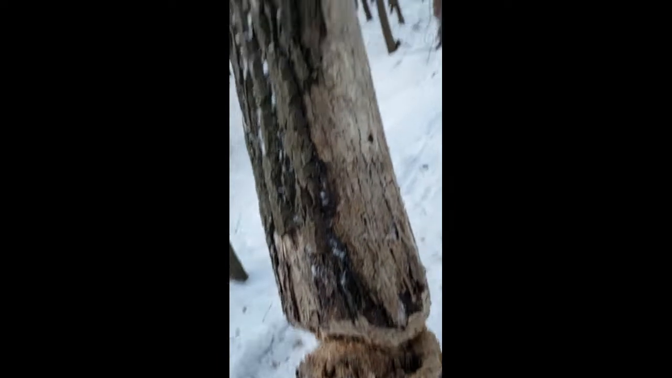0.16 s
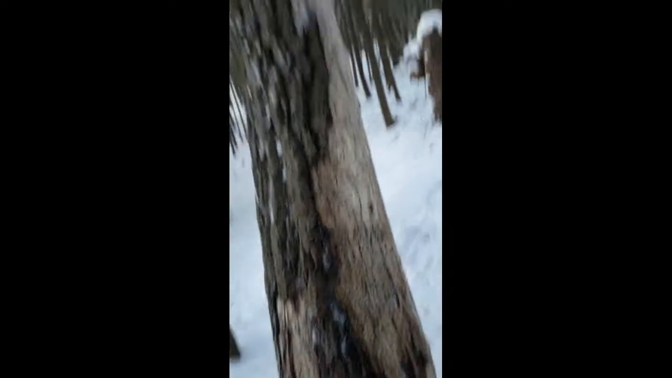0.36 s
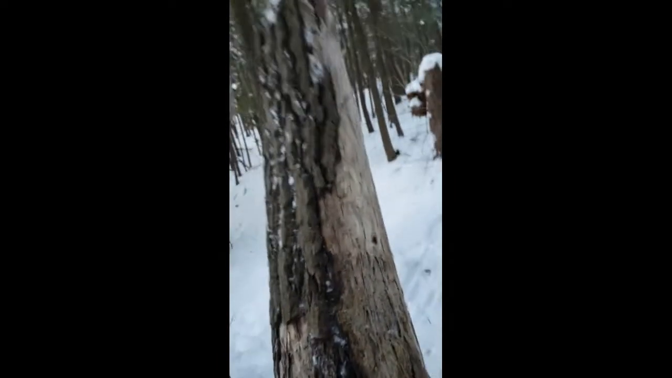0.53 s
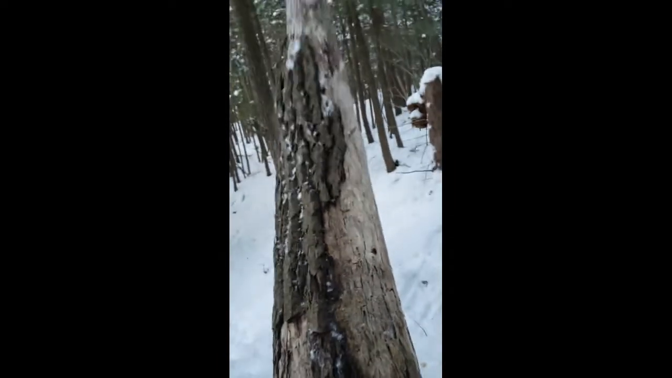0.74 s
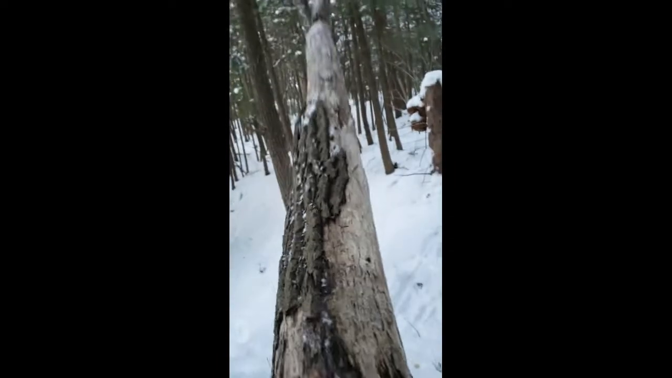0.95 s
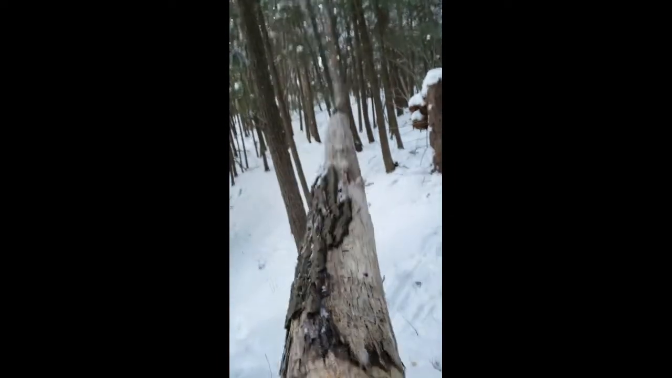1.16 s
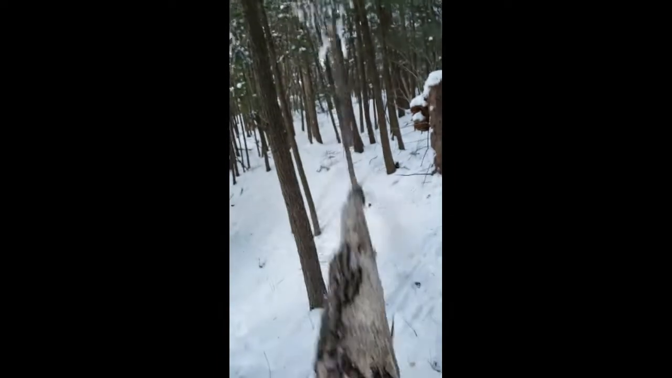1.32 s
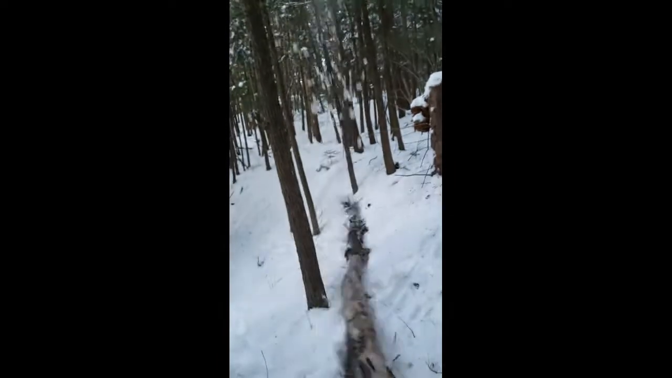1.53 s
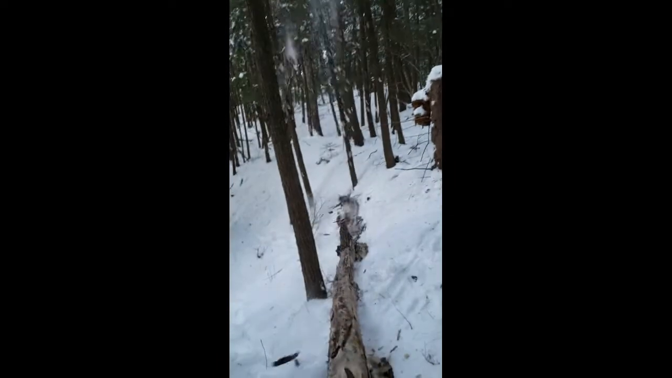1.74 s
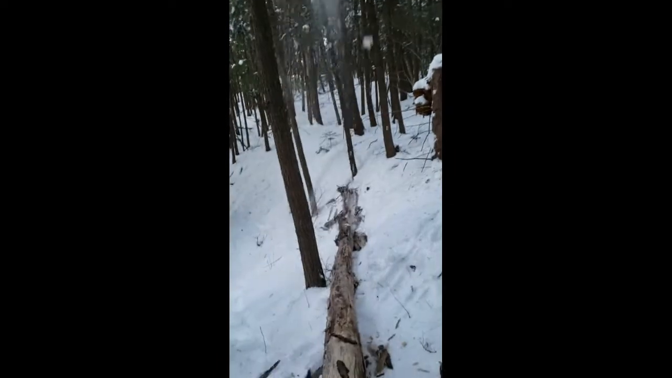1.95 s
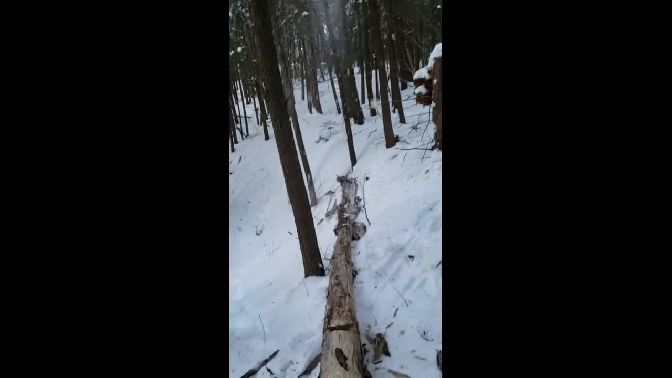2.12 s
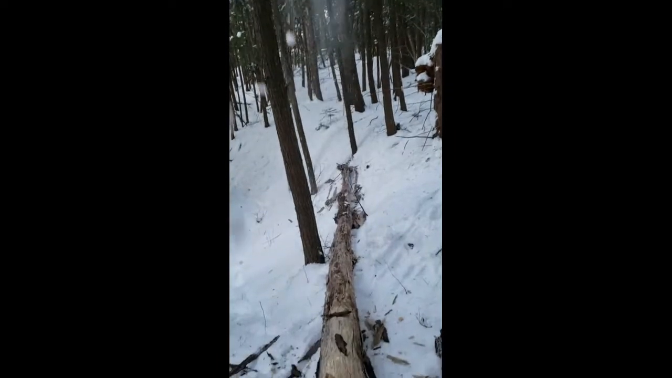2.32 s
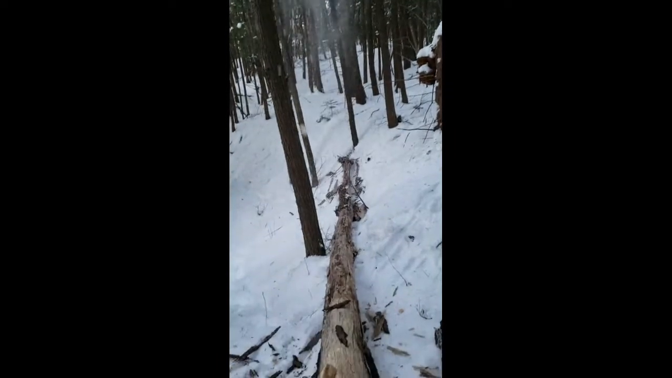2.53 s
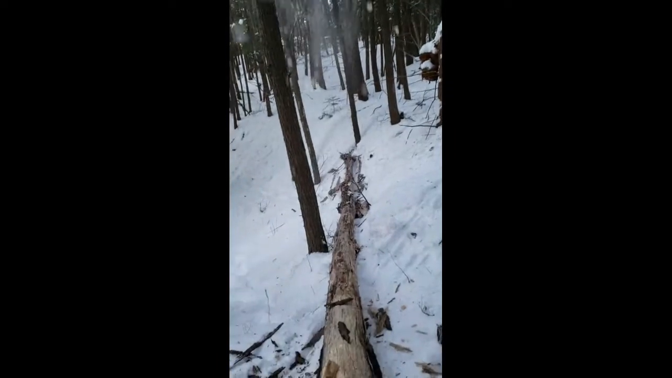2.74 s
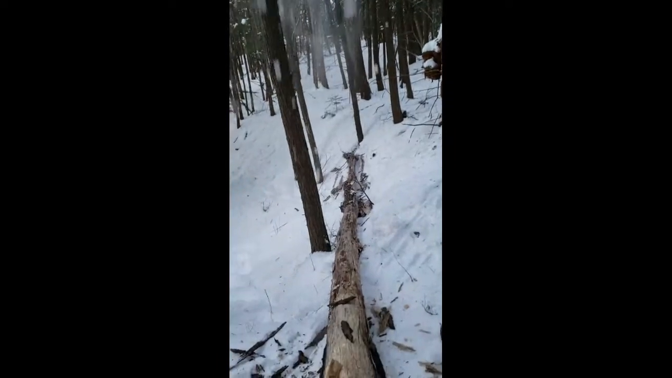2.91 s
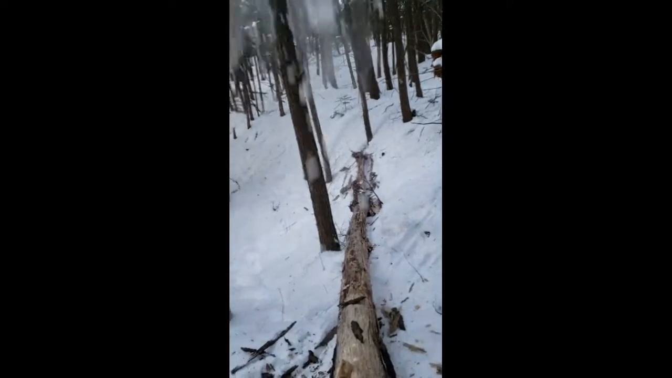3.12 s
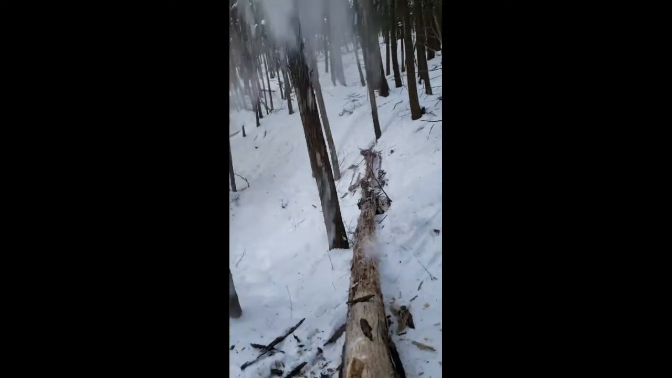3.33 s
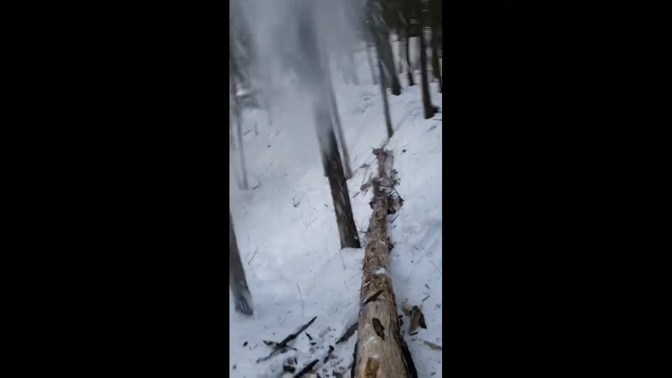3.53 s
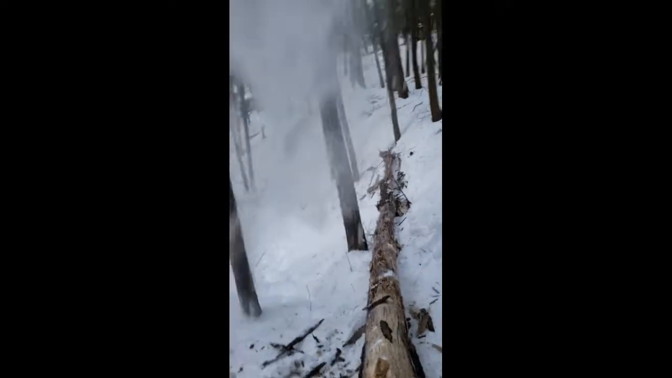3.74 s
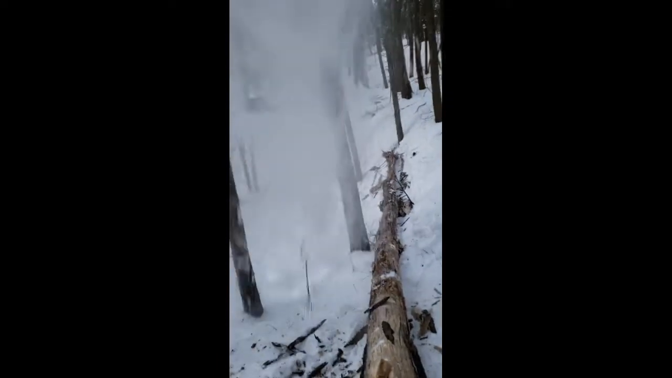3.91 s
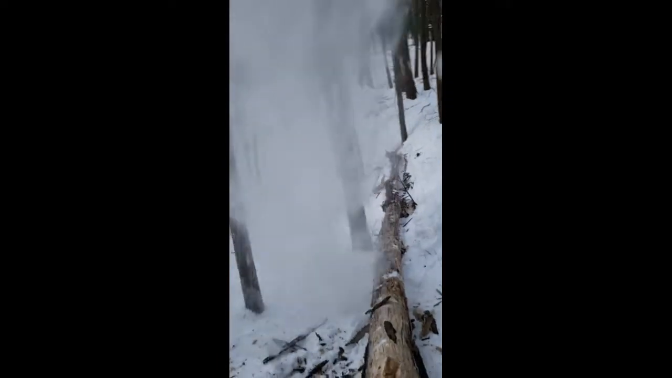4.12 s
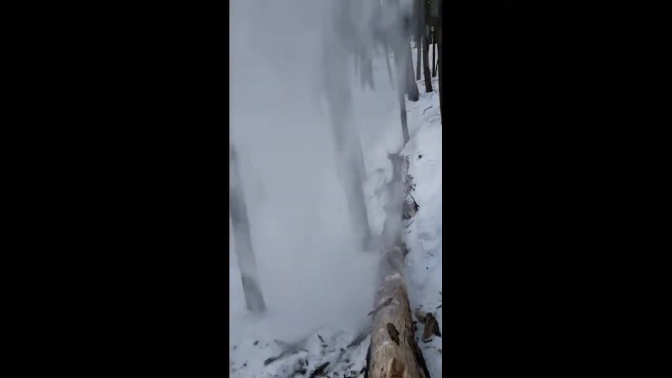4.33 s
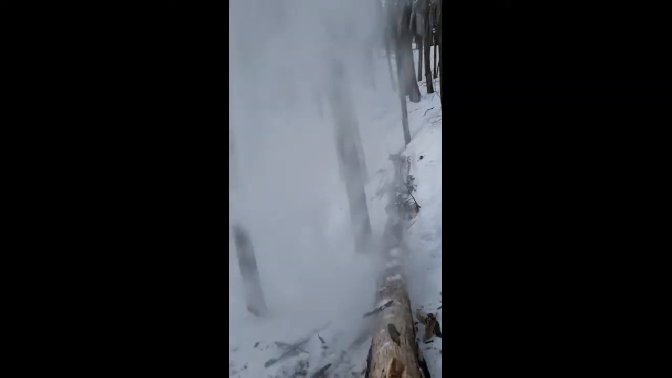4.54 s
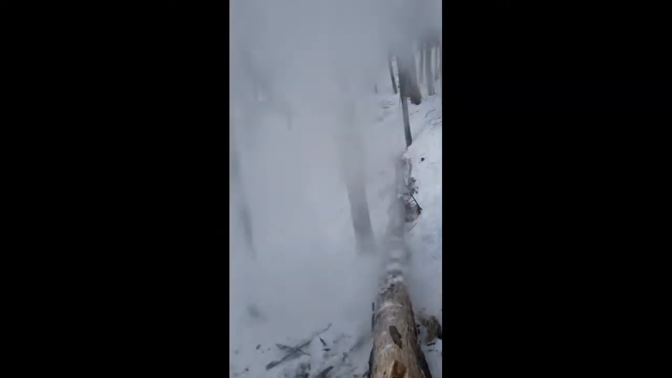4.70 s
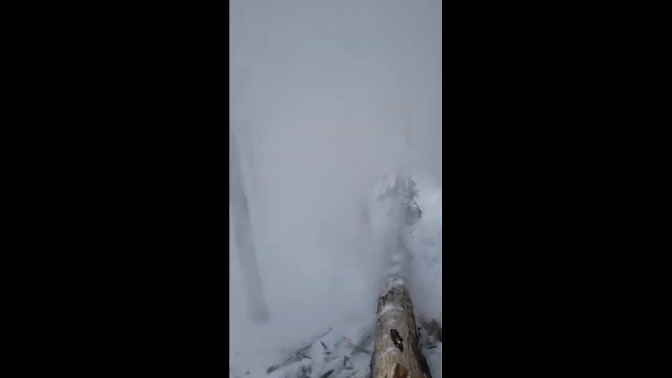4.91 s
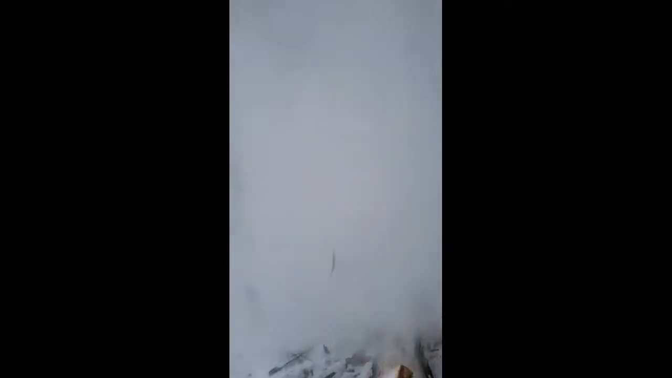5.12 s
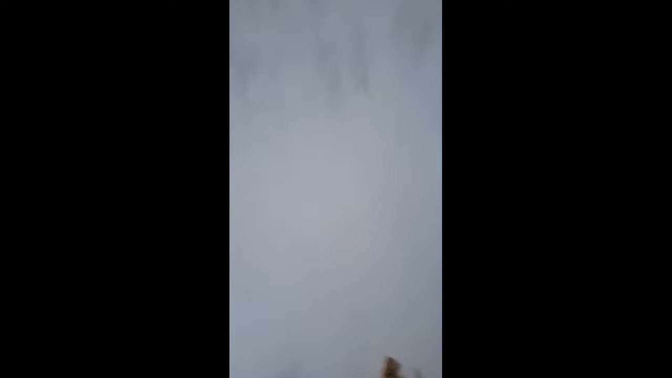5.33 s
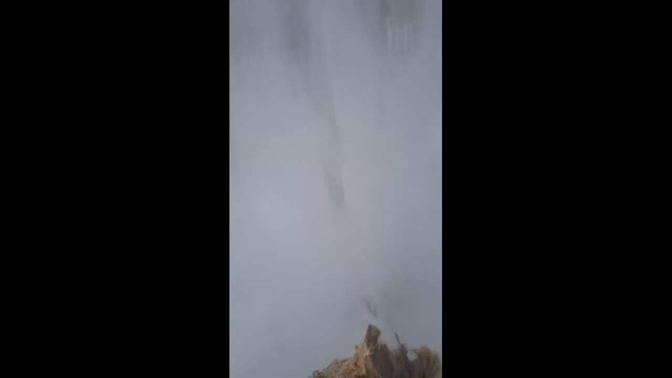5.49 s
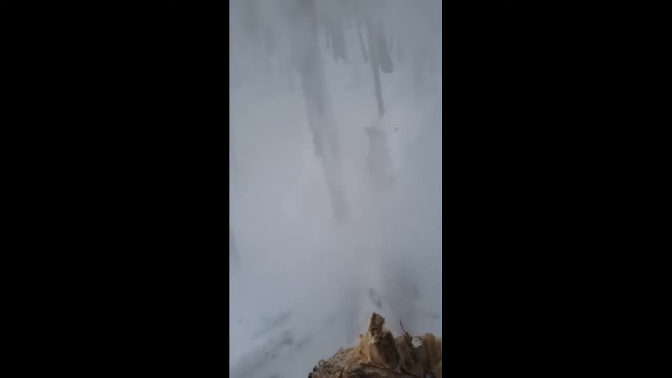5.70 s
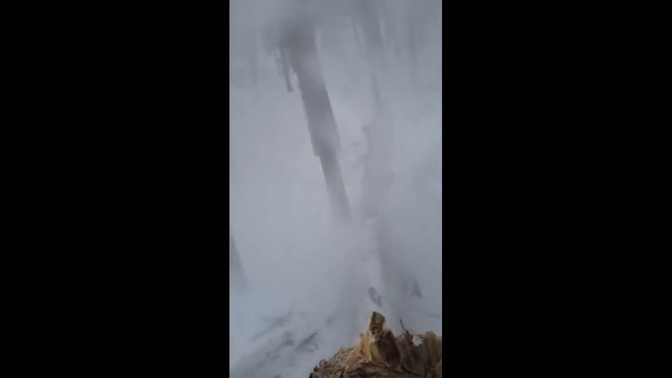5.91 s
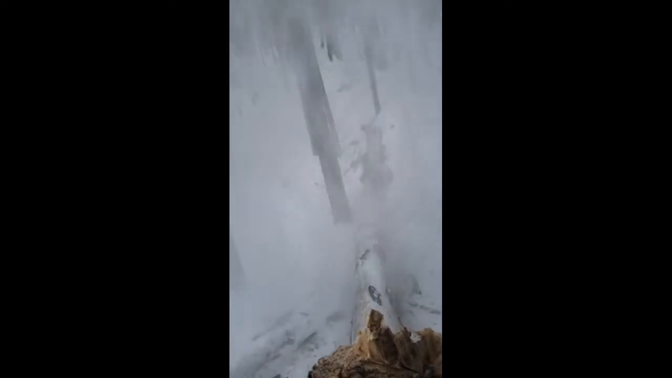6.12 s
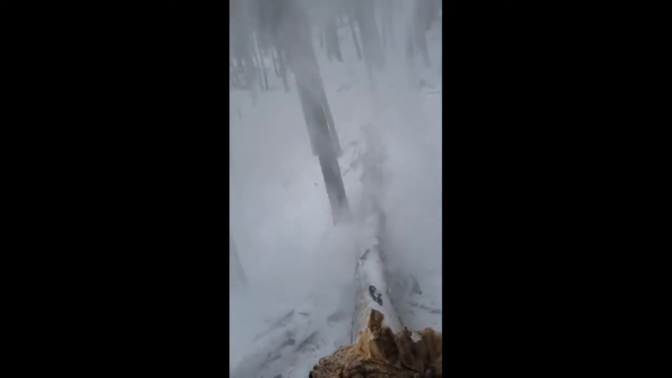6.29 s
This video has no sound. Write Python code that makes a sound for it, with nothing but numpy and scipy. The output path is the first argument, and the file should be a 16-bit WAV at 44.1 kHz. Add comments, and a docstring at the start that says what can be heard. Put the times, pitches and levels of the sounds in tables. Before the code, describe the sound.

In a quiet snowy forest, close to a handheld stereo microphone, a dead tree begins to fall. A faint high squeak of wood lasts a tenth of a second, then dry snaps multiply, strongest around 0.3-0.5 s, as the butt grinds in a low judder over its stump until about 0.65 s. More cracks and a short scrape follow; at 1.25 s splinters rasp shrilly. From 1.48 to 1.63 s the trunk lands in rapid heavy thuds, the loudest crunching at 1.55 s, with brittle crackle and faint echo. Debris patters away by 2.5 s, with soft thumps near 2.55 s. Powder hiss grows from about 3 s, joined by dense patter from 3.7 s. Soft snow lumps thump at 4.0-5.4 s, thickest around 4.3-4.6 and 5.2 s, among twig snaps and dull bark knocks. After 5.5 s it thins to scattered soft plops and fading hiss until 6.4 s.

```python
"""A dead tree is pushed over in a snowy forest, close by: stick-slip squeaks, sharp snaps and shrill rasps,
a grind of random collisions as the butt moves over its stump, then decaying thuds as the trunk lands.
The shaken trees around it shed their snow: filtered grains hiss and patter, soft lumps thump with a falling
pitch, twigs tick and falling bark knocks in damped modes. A faint echo follows the tree; the air stirs softly."""
import sys
import numpy as np
from scipy import signal
from scipy.fft import rfft, irfft
from scipy.io import wavfile

SR = 44100
rng = np.random.default_rng(int(sys.argv[2]) if len(sys.argv) > 2 else 0)


def put_to_file(sound):
    """Save the sound as 16-bit audio at rate SR, in the file named by the first command-line argument."""
    columns = np.atleast_2d(sound).T  # one column per channel
    safe = np.clip(columns, -1, 1)
    whole_steps = np.round(safe * 32767)
    wavfile.write(sys.argv[1], SR, whole_steps.astype(np.int16))


N = 284533
TIME = np.arange(N) / SR
LANDED_S = 1.68   # the grinding ends and the snowfall starts

# Spectrum of splintering wood. Each row: frequency in Hz, relative density in dB per Hz.
SPLINTER_SPECTRUM = [(500, 0.5), (1000, 3.5), (1800, -3), (3500, 2), (6000, -1), (9000, -3.5),
                     (16000, -9.5)]
# Spectrum of soft snow clumps. Each row: frequency in Hz, relative density in dB per Hz.
CLUMP_SPECTRUM = [(15, -40.5), (25, -19), (75, -1), (128, 0), (219, -4.5), (345, -9), (560, -19.5),
                  (800, -17.5), (1200, -22.5), (1560, -40.5), (2640, -120)]


def squeak(jitter=0.021, waver_hz=350, flutter=0.4):
    """Stick-slip friction: three contact spots at close pitches beat; two weaken as the slip gets smoother."""
    # Wood rubbing on wood. Each row: time in seconds, mean pitch in Hz, relative level in dB, roughness 0-1.
    friction = [(0, 3206, -41.5, 0.68), (.012, 3064, -45, 0.82), (.025, 3074, -46, 0.85),
                (.04, 3040, -46, 0.77), (.05, 2960, -40, 0.1), (.06, 2916, -38, 0.12),
                (.075, 2770, -37, 0.25), (.082, 2840, -35, 0.2), (.092, 3080, -46, 0.4),
                (.104, 3130, -46, 0.9), (.11, 3110, -75, 1)]
    # Harmonics. Each row: multiple of the pitch, level in dB when slipping smoothly, level in dB when rough.
    partials = [(1, 1, 0.5), (2, -11, -10.5), (3, -21, -9), (4, -21, -12)]
    hz, level_db, rough = in_time(friction)
    # pitch ratio and share of each contact spot
    spots = [(1, 1), (.93, from_db(-2) * rough), (1.1, from_db(-1) * rough ** 2)]
    tone = 0
    for ratio, share in spots:
        wobble, grip = (rms_one(butter(n, waver_hz, "low")) for n in rng.standard_normal((2, N)))
        phase = 2 * np.pi * np.cumsum(ratio * hz * (1 + jitter * rough * wobble)) / SR
        harmonics = 0
        for multiple, smooth_db, rough_db in partials:
            partial_db = smooth_db + rough * (rough_db - smooth_db)
            harmonics = harmonics + from_db(partial_db) * np.sin(round(multiple) * phase)
        tone = tone + share * (1 + flutter * grip) * rms_one(harmonics)
    return tone * from_db(level_db) * (TIME < friction[-1][0]) * from_db([[-2], [1]])


def cracks(rise_s=0.0002, break_after_s=0.0012, tearing=0.78, width_share=0.51, bright=.15,
           tail_db=-30, tail_s=0.048, left_lag_s=0.00025, shadow_hz=7000):
    """Impulsive fracture: a sharp release amid brief tearing rings the splinter and knocks the wood behind."""
    # Fibres, bark and twigs snapping. Each row: start in seconds, relative level in dB, pitch in Hz,
    # woody knock in dB re the snap, tearing time in ms, left-right pan in dB.
    snaps = [(0.0257, -53, 5200, 0, 2, -2), (0.0458, -45, 5200, -3.5, 1.6, -4),
             (0.073, -53, 5000, -17, 1.5, 0), (0.094, -43.5, 5000, -8, 2.6, 0),
             (0.1461, -43.5, 3640, -2, 2.1, -5), (.221, -45.5, 2250, -1.5, 5.6, 1),
             (0.23, -53.5, 12100, 1, 5.3, 2), (.2602, -59, 12200, 6, 3.1, -7),
             (.274, -53.5, 4770, -6, 1, 1), (.316, -38, 12800, -5, 1.2, 1),
             (0.3319, -32, 13600, -7, 1.4, -1), (.381, -56, 12500, -7, 1.6, 1),
             (.416, -28.5, 7840, -7.5, 1.4, 4), (.429, -44, 6300, -16, 0.88, 1),
             (0.4478, -44, 4400, -11, 2.2, -3), (0.4521, -34.5, 8600, -9, 1.7, -1),
             (.49, -43, 5230, 0, 2.8, 5), (0.514, -50, 5900, -11, 1.5, 0), (0.5243, -50, 5050, 1.5, 2, 5),
             (0.541, -44.5, 5370, 0, 3, 3), (.569, -45, 6240, -7, 1.3, 0), (0.6139, -49.5, 7000, -7, 2, 1),
             (0.6933, -53.5, 6370, -12, 3.4, 0), (0.6977, -59, 6300, -10, 1.5, -2),
             (0.709, -50, 12500, -8, 1.3, 3), (0.714, -49.5, 3180, -4, 4, -8),
             (0.74, -41, 9500, -20, 2.1, 6), (.744, -42.5, 5550, -5, 2.9, -1),
             (0.7523, -38.5, 7160, -7, 1.7, -4), (.814, -34.5, 3100, 0, 1.7, -3),
             (.8304, -62, 9000, -6, 1.5, 0), (0.939, -59, 9800, -8, 1.2, -7),
             (.9524, -63, 5720, -19, 2, -4), (0.9772, -48.5, 6440, -4, 2, -4),
             (1.049, -60, 5560, -5, 3.3, 1), (1.086, -59, 4500, -20, 3.2, -3),
             (1.249, -35.5, 11300, -5.5, 4.5, -1), (1.4851, -43, 2600, 7, 1.4, 1),
             (1.4935, -37.5, 2800, -2, 3, 0), (1.537, -36.5, 5000, -8, 3, -1),
             (1.5497, -32, 2500, -6, 4, -1), (1.577, -38.5, 3800, 0, 2.3, -2),
             (1.606, -27.5, 4000, -19, 5.4, -2.5), (1.9849, -65, 4900, -12, 2, -3),
             (2, -56, 14300, -20, 1.5, 2), (2.076, -61, 11100, -22.5, 2.5, -4),
             (2.331, -55, 11400, -19.5, 3.3, 5), (2.3512, -61.5, 5050, -16, 3.8, -6),
             (2.377, -50.5, 13860, -22, 4, 11), (3.1088, -57, 4760, 2.5, 4.6, -9.5),
             (3.582, -44, 7850, -6.5, 13, -0.5), (3.6394, -48, 3800, -0.5, 6.1, -3.5),
             (3.717, -38, 5050, -5, 2.5, 0.5), (3.9271, -41, 7600, -8, 2.2, 6),
             (4.1675, -45.5, 5400, -3, 2.1, -4), (4.4666, -48, 3500, -18, 5.1, -4),
             (4.5389, -39, 2580, -33, 1.8, 0.5), (4.713, -45, 5060, -10, 4, 2),
             (4.805, -47, 4250, -6.5, 9.6, -1), (4.9203, -32.5, 4000, -4.5, 2.3, -6),
             (4.9744, -47, 4060, -31, 1.8, -2), (5.154, -50.5, 14100, -16, 1, -5),
             (5.3632, -53, 4000, 3.5, 1, -11.5), (5.744, -57.5, 3500, 1, 1.1, -15),
             (5.9755, -46, 4170, -7.5, 5.6, 1)]
    out, t = np.zeros((2, N)), TIME[:SR // 20]
    age = t - break_after_s
    release = rms_one(1. * (np.arange(len(t)) == round(break_after_s * SR)))
    tail = from_db(tail_db) * np.exp(-np.abs(age) / tail_s) * (age > 0)
    for s, level_db, hz, knock_db, tear_ms, pan_db in snaps:
        tear_s = tear_ms / 1000
        tear_envelope = np.exp(np.minimum(age / rise_s, -age / tear_s)) + tail
        fibres, scatter = rng.laplace(size=(2, len(t))) * tear_envelope
        force = release + tearing * rms_one(fibres)
        # the left side hears mostly scattered sound
        force = np.array([0.26 * force + 1.5 * rms_one(scatter), force])
        snap = rms_one(resonate(force, hz, width_share * hz) + bright * butter(force, 1500, "high"))
        knock_hz = rng.uniform(432, 801)
        knock = rms_one(resonate(force, knock_hz, 480) - resonate(force, 2100, 1100))
        hit = (snap + from_db(knock_db) * knock) * from_db([[pan_db / 2], [-pan_db / 2]])
        i = round(s * SR)
        out[:, i:i + len(t)] += from_db(level_db) * hit[:, :N - i]
    # the left port is shadowed and a little farther away
    late_left = np.interp(TIME - left_lag_s, TIME, out[0])
    return np.array([from_db(-3.5) * butter(late_left, shadow_hz, "low"), out[1]])


def rasps(wander=0.13, waver_hz=900, octave_db=-5, flutter=0.93):
    """Irregular stick-slip: very fast, uneven slipping frequency-modulates a tone and its octave."""
    # Splinters dragged over each other. Each row: peak in seconds, rise in seconds, fall in seconds,
    # mean pitch in Hz, relative level in dB.
    drags = [(1.008, .003, 0.014, 2200, -55), (1.217, .004, 0.0034, 5770, -38),
             (1.2499, .0012, 0.002, 5774, -19), (1.264, .0008, 0.0026, 5670, -26.5),
             (1.268, .001, 0.0018, 5800, -25.5), (1.291, .002, .006, 3280, -35.5),
             (1.308, .003, .003, 5900, -43.5), (1.344, 0.0026, 0.0034, 6900, -33.5)]
    wobble, grip = (rms_one(butter(n, waver_hz, "low")) for n in rng.standard_normal((2, N)))
    warped_s, out = np.cumsum(1 + wander * wobble) / SR, 0
    for s, rise, fall, hz, db in drags:
        phase = 2 * np.pi * hz * warped_s
        tone = np.sin(phase) + from_db(octave_db) * np.sin(2 * phase)
        out = out + from_db(db) * swell(s, rise, fall) * tone
    return out * (1 + flutter * grip) * from_db([[-5], [0]])


def tipping():
    """Friction as random collisions: the butt judders over the stump in dull knocks while fibres tear."""
    # Stages of rubbing, then of tearing fibres. Each row: relative level in dB, full at seconds,
    # ends at seconds, rise in dB/s, sag in dB/s, fade in dB/s.
    leaning, sliding = (-54.5, .16, .37, 12, 3, 200), (-30, .422, .625, 2000, 34, 130)
    scraping, toppling = (-35.5, .71, .755, 300, 5, 350), (-50.5, 1.22, 1.29, 85, 3, 200)
    straining, ripping = (-56.5, .05, .41, 20, 8, 100), (-48, .45, .55, 240, 10, 70)
    parting, brushing = (-51, .74, .8, 120, 20, 55), (-51.5, 1.22, 1.3, 85, 3, 110)
    # The butt catches on the stump. Each row: peak in seconds, rise in seconds, fall in seconds, level in dB.
    jolts = [(.203, 0.0045, 0.0033, -41.5), (.275, 0.0097, 0.0038, -40.5), (.338, 0.0069, 0.0038, -42),
             (.818, .002, 0.0098, -43), (1.01, 0.0054, 0.025, -51)]
    # Spectrum of the grinding butt. Each row: frequency in Hz, relative density in dB per Hz.
    grind_spectrum = [(18, -32), (30, -6.5), (91, 0.5), (142, -3), (230, -2.5), (303, -11), (456, -17),
                      (560, -12.5), (800, -20.5), (1360, -31.5), (2500, -32), (3250, -59.5), (5500, -120)]
    rubbing = stage(leaning) + stage(sliding) + stage(scraping) + stage(toppling) + bursts(jolts)
    tearing = waves([straining, ripping, parting, brushing])
    judder = ticks(per_s=700, spread_db=1.7, low_hz=95, high_hz=300, cycles=3.5)
    catching = surge(depth_db=1.3, rate_hz=29)
    grit = grains(grind_spectrum, per_s=1100, spread_db=2.5, smooth=0.7)
    grind = rubbing * catching * (grit + 0.5 * judder)
    fibres = ticks(per_s=550, spread_db=3.5, low_hz=1000, high_hz=7000, cycles=3)
    crackle = grains(SPLINTER_SPECTRUM, per_s=2400, spread_db=8.0, smooth=0.94)
    splinter = tearing * (crackle + 0.4 * fibres)
    return (grind + splinter * from_db([[-.5], [.5]])) * (TIME < LANDED_S)


def landing():
    """Impact: each blow crushes snow and rotten wood and excites a damped thud in trunk and ground."""
    # The trunk strikes stump or ground. Each row: peak in seconds, rise in seconds, fall in seconds,
    # relative crunch level in dB, thud pitch in Hz, thud level in dB.
    blows = [(0.4264, 0.0025, 0.013, -44, 177, -24), (1.476, 0.0027, 0.0046, -44.5, 270, -23.5),
             (1.494, 0.0055, 0.012, -19.5, 175, -19.5), (1.506, 0.0062, 0.013, -20.5, 149, -20.5),
             (1.5422, 0.0063, 0.0014, -14.5, 85, -24), (1.5454, 0.00082, 0.0072, -10.5, 189, -8.5),
             (1.580, 0.024, 0.017, -27, 115, -28.5), (1.595, 0.0092, 0.011, -29.5, 79.7, -17.5),
             (1.625, 0.011, 0.03, -34.5, 51.4, -23), (1.745, 0.02, 0.03, -65.5, 52, -39.5)]
    # Spectrum of crushed snow and wood. Each row: frequency in Hz, relative density in dB per Hz.
    crunch_spectrum = [(40, -3.5), (120, -5), (260, 1), (400, -7), (520, -5.5), (640, -7.5), (820, -7),
                       (1150, -8.5), (1400, -15.5), (2600, -12.5), (4500, -21.5), (7000, -23.5),
                       (11000, -30.5), (16000, -38.5)]
    force, thud = 0, 0
    for s, rise, fall, crunch_db, hz, thud_db in blows:
        push = swell(s, rise, fall)
        force = force + from_db(crunch_db) * push
        thud = thud + from_db(thud_db) * push * np.cos(2 * np.pi * hz * (TIME - s))
    crunch = force * grains(crunch_spectrum, per_s=5000, spread_db=3.5, smooth=0.89)
    return crunch * from_db([[-1.5], [.5]]) + thud


def shatters():
    """Brittle fracture: dense random breaks crackle brightly while the chips ring."""
    # Brittle wood, twigs or icy crust crushed. Each row: peak in seconds, rise in seconds,
    # fall in seconds, relative level in dB.
    sprays = [(1.147, 0.0065, 0.01, -43), (1.263, 0.033, 0.053, -38.5), (1.607, 0.028, 0.02, -31),
              (1.625, 0.0017, 0.0026, -47.5), (1.829, .003, .006, -52), (1.852, .003, .005, -53.5),
              (1.914, .003, 0.0091, -53), (2.025, 0.035, 0.014, -54), (2.238, 0.0056, 0.012, -53.5),
              (2.355, 0.0099, 0.011, -65), (3.46, 0.0038, 0.0062, -47.5), (4.568, 0.0026, 0.0052, -37.5),
              (4.646, 0.002, 0.0024, -34.5), (4.653, 0.0018, 0.0022, -44), (4.69, .0005, 0.0035, -31.5),
              (4.7445, 0.00078, 0.0089, -34), (5.0435, 0.00052, 0.0032, -31.5),
              (5.174, 0.00089, 0.00098, -41), (5.499, 0.006, 0.049, -39.5), (5.745, 0.011, 0.021, -40),
              (5.842, 0.0065, 0.023, -44)]
    chips = ticks(per_s=1600, spread_db=2.0, low_hz=905, high_hz=6850, cycles=7.5)
    crackle = grains(SPLINTER_SPECTRUM, per_s=2600, spread_db=5.5, smooth=0.22)
    return bursts(sprays) * (crackle + 0.24 * chips) * from_db([[-2], [0]])


def snowfall(onset_s=0.02, settling_clumps_db=-5, bark_db=-5):
    """Granular noise: powder hisses, crumbs of ice and bark patter in spurts, small clumps rumble."""
    # Snow comes down in waves. Each row: relative level in dB, full at seconds, ends at seconds,
    # rise in dB/s, sag in dB/s, fade in dB/s.
    powder_waves, patter_waves, clump_waves = [(-63.5, 1.95, 2.02, 14, 3, 40),
                                               (-47.3, 3.5, 5.0, 15, .6, 5.5)], [(-67, 3.3, 3.5, 18, 0, 30),
                                                                     (-45.8, 3.72, 4.5, 55, 4.6, 45),
                                                                     (-48.5, 5.15, 5.53, 30, -3, 55),
                                                                     (-60, 5.9, 6.25, 20, 2, 45)], [(-52.3, 3.8, 4.1, 19, 0, 10),
                                                                                           (-47, 4.43, 4.58, 28, 0, 55),
                                                                                           (-51.5, 5.22, 5.3, 42, 8, 15),
                                                                                           (-44, 5.235, 5.27, 150, 0, 300)]
    # A branch drops its powder. Each row: peak in seconds, rise in seconds, fall in seconds,
    # relative level in dB.
    puffs = [(2.238, 0.0076, 0.0085, -42), (2.311, 0.0036, .004, -50.5), (3.32, 0.023, 0.012, -48),
             (3.368, 0.0042, 0.003, -42.5)]
    # Spectra of powder and crumbs. Each row: frequency in Hz, relative level in dB.
    powder_spectrum, patter_spectrum = [(1400, -30), (2000, -14), (2450, -3), (3100, -12.5), (4000, -2),
                                        (5000, -4), (6200, -7), (7800, 2.5), (9500, 0), (11500, 5.5),
                                        (16000, 2)], [(250, 4), (600, 2), (1300, -5.5), (2600, -1),
                                                        (5500, -3.5), (8000, -4.5), (16000, -23.5)]

    # bark and crumbs thrown up by the landing die away at 19.5 dB per second
    settling = from_db(-58.5 - 19.5 * np.maximum(TIME - LANDED_S, 0))
    powder_level = (waves(powder_waves) + bursts(puffs)) * surge(depth_db=1.4, rate_hz=21)
    powder = powder_level * grains(powder_spectrum, per_s=2400, spread_db=4.5, smooth=0.84)
    crumbs = ticks(per_s=220, spread_db=3, low_hz=550, high_hz=2800, cycles=3)
    crackle = grains(patter_spectrum, per_s=750, spread_db=3.5, smooth=.8)
    bark = settling * ticks(per_s=130, spread_db=2.5, low_hz=800, high_hz=4500, cycles=3)
    spurts = surge(depth_db=1.3, rate_hz=21)
    clusters = surge(depth_db=1.5, rate_hz=140)
    patter = (waves(patter_waves) + settling) * spurts * clusters * (crackle + 0.28 * crumbs)
    clump_level = np.maximum(waves(clump_waves), from_db(settling_clumps_db) * settling)
    clumps = clump_level * grains(CLUMP_SPECTRUM, per_s=97, spread_db=4, smooth=0.5)
    snow = powder * from_db([[0], [.3]])
    snow = snow + patter * from_db([[-.7], [.7]])
    snow = snow + clumps * from_db([[-3], [2.3]])
    snow = snow + from_db(bark_db) * bark
    return snow * swell(LANDED_S, onset_s, np.inf)


def lumps(contact_s=0.00099, crunch_db=-7, ring_cycles=0.56, sink=0.21):
    """Damped impact: a dull crunch and a thump whose pitch drops as it sinks in; deep thumps last longer."""
    # Larger lumps of snow and bark landing. Each row: start in seconds, relative level in dB,
    # pitch in Hz that the thump drops to.
    falls = [(1.402, -36.5, 230), (2.131, -44, 140), (2.534, -33.5, 104), (2.555, -43, 201),
             (2.597, -41.5, 127.5), (2.788, -49.5, 150.7), (4.012, -34.5, 215), (4.049, -43, 300),
             (4.274, -30, 218), (4.328, -31.5, 113), (4.35, -35, 96), (4.417, -29.5, 140),
             (4.502, -28.5, 170), (4.536, -32, 105), (4.552, -30.5, 150), (4.63, -28.5, 335),
             (4.655, -37, 167), (4.796, -33, 196), (5.029, -30, 189), (5.151, -24, 384), (5.185, -28, 404),
             (5.2, -25.5, 465), (5.221, -45, 300), (5.229, -34, 100), (5.25, -35, 114), (5.363, -40, 300),
             (5.383, -32, 218), (5.497, -35, 153), (5.596, -32, 200), (5.676, -43, 120), (5.698, -41, 75),
             (5.752, -39, 130), (5.842, -40.5, 222), (5.875, -38.5, 170), (5.944, -37, 282),
             (5.971, -43, 170), (6.011, -41, 180), (6.045, -39.5, 218), (6.095, -40, 124),
             (6.172, -40, 130), (6.209, -38.5, 202), (6.284, -38, 211), (6.332, -47, 85), (6.377, -39, 182)]
    crunch, out = grains(CLUMP_SPECTRUM, per_s=880, spread_db=-1.0, smooth=0.36), np.zeros((2, N))
    t = TIME[:SR // 8]
    for s, db, hz in falls:
        cycles = hz * t
        thump = np.sin(2 * np.pi * (cycles + sink * (1 - np.exp(-cycles))))
        push = from_db(db) * (1 - np.exp(-t / contact_s)) * np.exp(-cycles / ring_cycles)
        i = round(s * SR)
        out[:, i:i + len(t)] += push[:N - i] * (thump[:N - i] + from_db(crunch_db) * crunch[:, i:i + len(t)])
    return out * from_db([[-3], [2]])


def knocks(cycles=6.6, crunch_db=-14):
    """Modal excitation: a short, gritty contact sets a piece of bark ringing in a few damped modes."""
    # Bark and dead twigs landing. Each row: start in seconds, relative level in dB, pitch in Hz,
    # contact decay in seconds.
    contacts = [(2.112, -70, 2400, .002), (3.882, -57, 1200, 0.0019), (4.045, -50.5, 1080, 0.0046),
                (4.465, -47.5, 1100, 0.0069), (4.69, -58, 890, 0.0043), (5.15, -53.5, 776, 0.0018),
                (5.183, -61, 740, 0.0024), (5.2, -69, 700, .002), (5.363, -59, 700, 0.00078),
                (5.575, -60, 1630, 0.0022), (5.944, -61, 794, 0.0012), (6.278, -77, 890, .002)]
    # Modes of a piece of bark. Each row: ratio to its pitch, relative level in dB.
    modes = [(1, 6), (1.75, 0), (2.7, -4.5)]
    out, t = np.zeros((2, N)), TIME[:SR // 20]
    for s, db, hz, contact_s in contacts:
        grit = rng.standard_normal((3, len(t))) * np.exp(-t / contact_s)
        force = grit[0] + .5 * grit[1:]   # one shared contact, plus some of each side's own
        ring = 0
        for k, (ratio, mode_db) in enumerate(modes):
            ring = ring + (-1) ** k * from_db(mode_db) * resonate(force, ratio * hz, hz / cycles)
        i = round(s * SR)
        out[:, i:i + len(t)] += from_db(db) * (rms_one(ring) + from_db(crunch_db) * rms_one(force))
    return out * from_db([[-1], [1]])


def forest(x, t60=0.82, wet_db=-29, dull_hz=6000):
    """Diffuse reverberation: trunks scatter a faint decaying echo; the snow swallows most of it."""
    t = TIME[:SR]
    echoes = rng.standard_normal((2, SR)) * from_db(-60 * t / t60) * (t > .012)
    echoes = rms_one(butter(echoes, [200, dull_hz], "band", order=1)) / np.sqrt(SR)   # unit energy
    return x + from_db(wet_db) * signal.fftconvolve(x, echoes, axes=1)[:, :N]


def air(level_db=-73):
    """Turbulence as low band noise: cold air stirs faintly and independently at each port."""
    return from_db(level_db) * rms_one(butter(rng.standard_normal((2, N)), [22, 90], "band"))


def grains(spectrum, per_s, spread_db, smooth):
    """Shot noise: random collisions of uneven size over a wash of smaller ones, coloured; stereo, rms 1."""
    # Coherence of the two sides. Each row: frequency in Hz, left-right likeness 0-1.
    likeness = [(100, 0.96), (500, 0.6), (1000, 0.23), (2000, 0.068), (5000, 0.032), (12000, 0.033)]
    sizes = from_db(spread_db * np.minimum(rng.exponential(1, (2, N)), 3)) * rng.choice([-1, 1], (2, N))
    clicks = rms_one(sizes * (rng.random((2, N)) < per_s / SR)) + smooth * rng.standard_normal((2, N))
    hz = np.arange(N // 2 + 1) * SR / N
    # a causal filter, so that each grain starts sharply and rings afterwards
    cepstrum = irfft(np.log(from_db(at_hz(spectrum, hz))), N)
    mid, side = rfft(clicks) * np.exp(rfft(2 * cepstrum[:N // 2], N))
    alike = np.clip(at_hz(likeness, hz), 0, 1)
    stereo = np.sqrt(1 + alike) * mid + np.sqrt(1 - alike) * side * [[1], [-1]]
    return rms_one(irfft(stereo, N))


def ticks(per_s, spread_db, low_hz, high_hz, cycles, count=24):
    """Resonant shot noise: crumbs of many sizes each ring a few cycles at one of many pitches; rms 1."""
    sizes = from_db(spread_db * np.minimum(rng.exponential(1, N), 3)) * rng.choice([-1, 1], N)
    clicks = sizes * (rng.random(N) < per_s / SR)
    dealt = rng.integers(0, count, N)   # which pitch each click rings at
    out = 0
    for k, hz in enumerate(np.geomspace(low_hz, high_hz, count)):
        out = out + resonate(clicks * (dealt == k) + 1e-18, hz, hz / cycles)
    return rms_one(out)


def surge(depth_db, rate_hz):
    """Random amplitude modulation: low-passed noise, of the given rms depth, moves a gain in decibels."""
    return from_db(depth_db * rms_one(butter(rng.standard_normal(N), rate_hz, "low")))


def swell(s, rise, fall):
    """Exponential growth and decay: an envelope that reaches 1 at time s and dies away."""
    return np.exp(np.maximum(np.minimum((TIME - s) / rise, (s - TIME) / fall), -np.log(1e9)))


def bursts(rows):
    """Superposition of amplitudes: the envelopes of short swells add up."""
    return sum(from_db(db) * swell(s, rise, fall) for s, rise, fall, db in rows)


def stage(row):
    """Piecewise exponential envelope: it builds up, holds while sagging at a set rate, then fades."""
    db, full, end, rise, sag, fade = row
    loss = rise * np.maximum(full - TIME, 0)
    loss = loss + sag * (np.clip(TIME, full, end) - full)
    loss = loss + fade * np.maximum(TIME - end, 0)
    return from_db(db - loss)


def waves(rows):
    """Incoherent addition: overlapping stages add in power."""
    return np.sqrt(sum(stage(row) ** 2 for row in rows))


def resonate(x, hz, width_hz):
    """Damped resonator: one resonance with gain 1 on top."""
    hz = min(hz, .45 * SR)
    return signal.lfilter(*signal.iirpeak(hz, hz / min(width_hz, SR / 4), fs=SR), x)


def butter(x, hz, kind, order=2):
    """Linear filtering: a causal Butterworth filter."""
    return signal.sosfilt(signal.butter(order, np.clip(hz, 10, .47 * SR), kind, fs=SR, output="sos"), x)


def at_hz(points, hz):
    """Logarithmic frequency scale: interpolate a spectrum along it."""
    f, value = np.transpose(points)
    return np.interp(np.log(hz + 1), np.log(f), value)


def in_time(rows):
    """Linear interpolation: each column of a curve at every sample."""
    s, *columns = np.transpose(rows)
    return [np.interp(TIME, s, c) for c in columns]


def from_db(db):
    """Logarithmic level: decibels to amplitude gain."""
    return 10 ** (np.asarray(db) / 20)


def rms_one(x):
    """Power normalisation: scale to unit mean square."""
    return x / np.sqrt(np.mean(x ** 2) + 1e-20)


def scene():
    """Superposition: the echoing tree goes down, and the snow falls over the faint air."""
    tree = squeak() + cracks() + rasps() + tipping() + landing() + shatters()
    return forest(tree) + snowfall() + lumps() + knocks() + air()


def record(dry):
    """Resonance and saturation: the right port colours the treble, peaks are rounded, the top is cut."""
    # Peaks and dips of the right microphone port. Each row: frequency in Hz, width in Hz, gain in dB.
    port = [(4000, 600, 1.5), (5476, 1410, 9.5), (6210, 340, 0.5), (6900, 890, -5), (8240, 690, -0.5),
            (9900, 6000, -3.5), (11400, 1010, 7.5), (14100, 2320, 9.5), (15500, 730, -0.5)]
    left, right = dry
    for hz, width_hz, db in port:
        right = right + (from_db(db) - 1) * resonate(right, hz, width_hz)
    without_rumble = butter(np.array([left, right]), 28, "high")
    rounded = 1.1 * np.tanh(without_rumble / 1.1)
    top_cut = signal.ellip(10, .1, 70, 16000, fs=SR, output="sos")   # steep low-pass at 16 kHz
    return signal.sosfilt(top_cut, rounded)


dry = scene()
out = record(dry)
put_to_file(out)
```